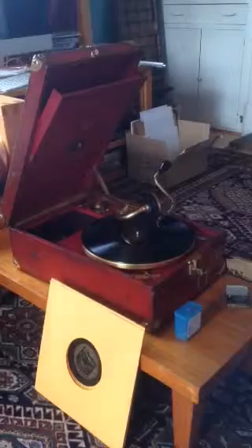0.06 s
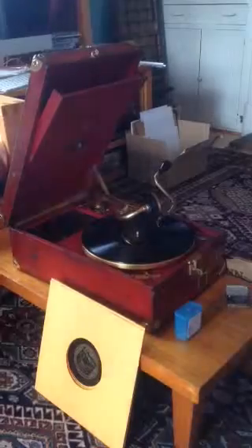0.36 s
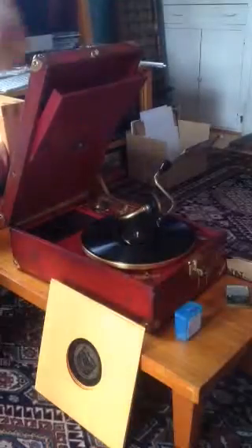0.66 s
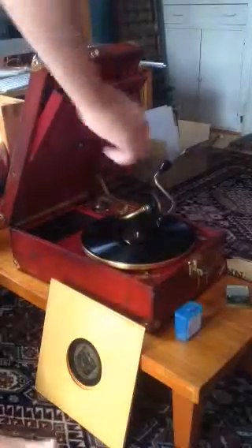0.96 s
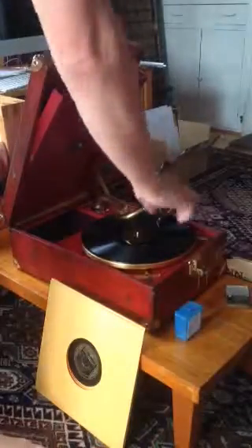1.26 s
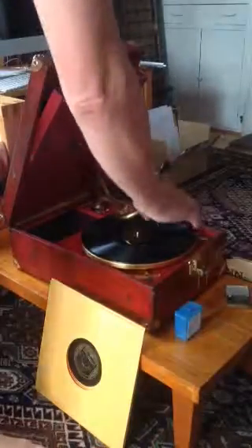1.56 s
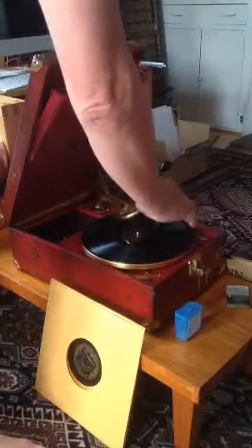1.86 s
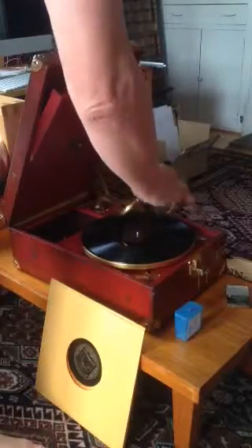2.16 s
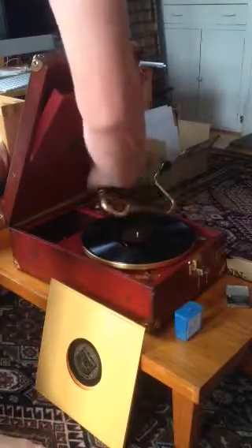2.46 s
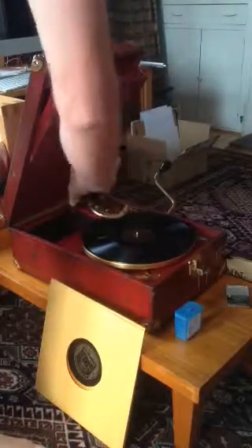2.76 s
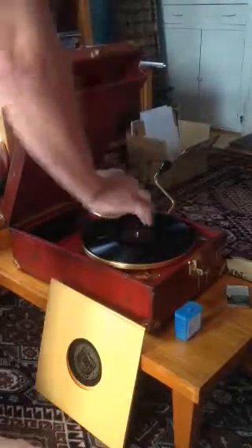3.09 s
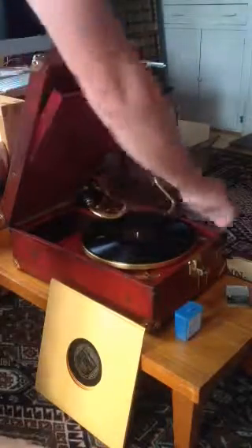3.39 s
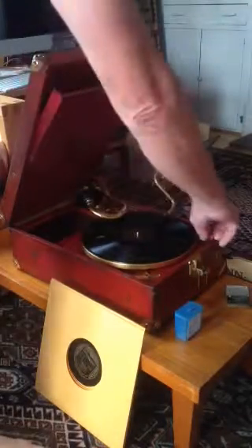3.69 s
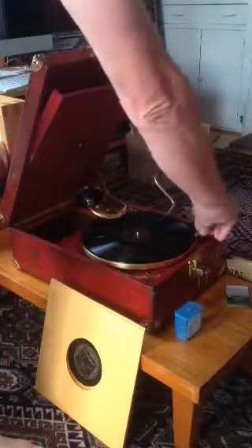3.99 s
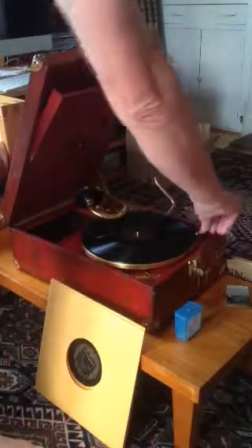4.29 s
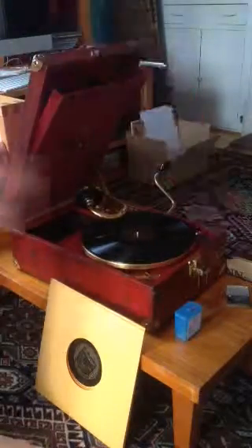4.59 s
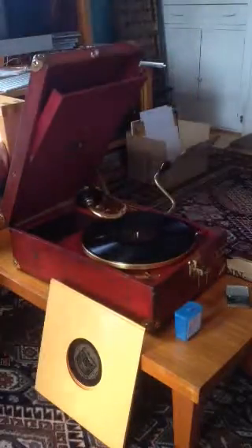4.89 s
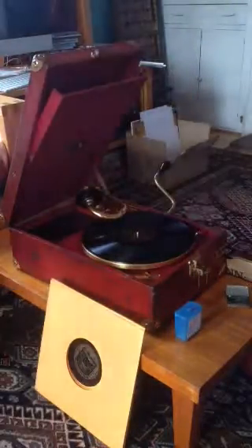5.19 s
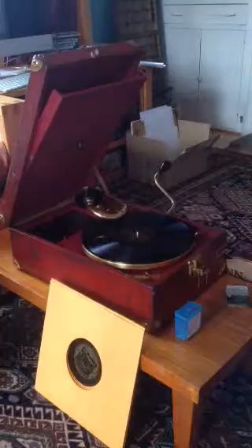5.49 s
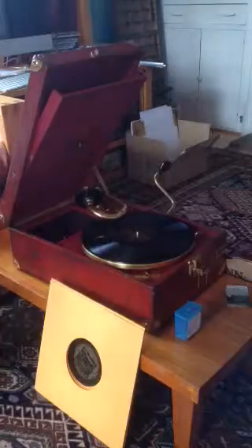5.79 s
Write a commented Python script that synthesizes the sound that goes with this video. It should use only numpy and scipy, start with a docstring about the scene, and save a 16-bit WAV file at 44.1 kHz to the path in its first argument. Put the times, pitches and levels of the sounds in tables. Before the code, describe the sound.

Faint record hiss cuts off, then a wind-up gramophone gives a clattering clack and a few small clicks in a quiet room.

```python
"""A wind-up portable gramophone runs out its record, close to one microphone in a carpeted room.
The steel needle rubs the groove, hissing and crackling through the horn, until the arm is lifted.
The brake bites with a clattering clack: steel chatters, the wooden case rings, the works rattle out.
Then something hard is handled nearby, with a few lighter clicks and brief scrapes.
Behind it all are soft rustles of clothes, quiet room tone and microphone hiss."""
import sys
import numpy as np
from scipy import signal
from scipy.fft import rfft, irfft
from scipy.io import wavfile

SR = 44100
rng = np.random.default_rng(int(sys.argv[2]) if len(sys.argv) > 2 else 0)


def generate_wav(signal):
    """Clip the signal to [-1, 1] and save it as 16-bit WAV at the path in sys.argv[1]."""
    frames = np.transpose(np.atleast_2d(signal))
    scaled = np.clip(frames, -1, 1) * 32767
    pcm = np.round(scaled).astype(np.int16)
    wavfile.write(sys.argv[1], SR, pcm)


N = 257984
TIME = np.arange(N) / SR


# hiss at the needle tip: t/s, relative level/dB
GROOVE_HISS = [(0.0, -58.5), (0.02, -61.5), (0.24, -59.5), (0.34, -61), (0.52, -56.5), (0.68, -61),
               (0.71, -53.5), (0.78, -61.5), (0.87, -56.5), (0.96, -62), (1.11, -55.5), (1.16, -60),
               (1.22, -58), (1.57, -58.5), (1.6, -57.5), (1.68, -61), (1.8, -58.5), (2.13, -56)]
# specks in the groove, the last just before the arm lifts: t/s, relative level/dB
SPECKS = [(.186, -48), (0.543, -44), (.603, -49), (0.713, -49.5), (1.099, -47.5), (1.597, -45),
          (2.144, -45)]
def needle(grains_per_s, size_spread_db, patchy_db, hiss_db, pop_db, lift_s, lift_fade_s):
    """The tip rubs the groove and hits grains of shellac filler, louder in worn patches; specks pop."""
    sizes = from_db(size_spread_db * np.minimum(rng.exponential(1, N), np.pi)) * rng.choice([-1, 1], N)
    grains = rms_one(sizes * (rng.random(N) < grains_per_s / SR))
    wear = rms_one(softened(rng.standard_normal(N), cut_hz=120))
    rubbing = rms_one(grains * from_db(patchy_db * np.tanh(wear)) + rng.standard_normal(N))
    in_groove = np.clip((lift_s - TIME) / lift_fade_s, 0, 1)
    level = from_db(np.interp(TIME, *np.transpose(GROOVE_HISS)) + hiss_db) * in_groove
    times, speck_db = np.transpose(SPECKS)
    pops = sum(contact(times, speck_db + pop_db, skid_s=0.0022, rough_db=17.5))
    return level * rubbing + pops


# passband of soundbox and horn: f/Hz, relative level/dB
HORN_PASSBAND = [(100, -32), (250, -7), (450, -4.5), (750, -3.5), (1080, -4), (1350, -3.5), (2300, -4.5),
                 (2900, -9.5), (3400, -11.5), (4000, -12), (4400, -19), (7000, -24.5), (14000, -28)]
# resonances of horn and diaphragm: f/Hz, width/Hz, lift/dB
HORN_RESONANCES = [(693, 40, 5), (865, 95, 5.5), (1205, 30, 4), (1286, 30, 5), (1394, 30, 4), (1499, 30, 4),
                   (1640, 60, 7.5), (1803, 30, 4), (2118, 40, 5), (2460, 45, 5), (2720, 100, 8),
                   (3085, 45, 11), (3860, 80, 10)]
def horn(x):
    """The diaphragm and the folded horn pass the middle range and add their resonances."""
    x = coloured(x, HORN_PASSBAND)
    for hz, width_hz, lift_db in HORN_RESONANCES:
        x = x + (from_db(lift_db) - 1) * signal.lfilter(*signal.iirpeak(hz, hz / width_hz, fs=SR), x)
    return x


# knocks on the machine, the loudest as the brake bites: t/s, force/dB, hardness/octaves
CASE_KNOCKS = [(.105, -56, .8), (.49, -52, 1.24), (.527, -55.5, 1.5), (.545, -60, 5.6), (.749, -51.5, 0.84),
               (1.088, -52.5, 1.7), (2.085, -50.5, .6), (2.106, -51.5, 0.55), (2.296, -67.5, 3.2),
               (2.573, -65.5, 4.5), (2.682, -66, 3.7), (3.454, -61.5, 2.9), (3.658, -46, 1.7),
               (3.836, -53.5, 2.03), (3.999, -45, 5.4), (4.004, -45, 1.8), (4.030, -40.5, 5.5),
               (4.0378, -36.5, 3.1), (4.046, -31.5, 1.37), (4.054, -23, 3.4), (4.0915, -28, 2.97),
               (4.094, -29.5, 0.088), (4.101, -35, 3.2), (4.111, -34, 3.4), (4.1265, -36, 2.44),
               (4.184, -47, 4.7), (4.198, -46.5, 2.7), (4.214, -49, 2.05), (4.263, -54, 3.7),
               (4.3059, -52.5, 2.25), (4.3876, -64, 4)]
# damped modes of the wooden case and motor board: f/Hz, relative level/dB, t60/s
CASE_MODES = [(59.7, -11, 0.11), (125, 1.5, 0.12), (205, -12, 0.16), (324, -1, 0.063), (378, -1.5, 0.055),
              (517, 1, 0.037), (675, -2, 0.025), (804, 7, 0.019), (1140, 10, 0.0064), (2010, 3, 0.025),
              (1910, 5, 0.0066), (2400, 9.5, 0.016), (2960, 13, 0.005), (3760, 3, 0.0051),
              (4000, -14, 0.011)]
# colour of the crack where the parts meet: f/Hz, relative level/dB
CASE_CRACK = [(1500, -8), (4000, 1), (5300, -0.5), (7000, -11), (10000, -15.5), (15000, -29)]
def gramophone_body():
    """Knocks and the rattling works ring the wooden case and the metal in it, each with a crack."""
    knocks = np.vstack([CASE_KNOCKS, works_rattle(count=12, gap_s=0.024, jitter_s=0.00594)])
    wood = struck(knocks, CASE_MODES, skid_s=0.002, rough_db=2.5, gain_db=1)
    metal = metalwork(knocks, driven_at_hz=2000, gain_db=-1)
    return softened(wood + metal, cut_hz=4000) + cracks(knocks, CASE_CRACK, gain_db=-50.5, fade_s=0.017)


# steel ticking when touched, chattering as the brake bites: t/s, level/dB, lean to the upper note/dB
BRAKE_TICKS = [(2.575, -54, 5), (3.836, -53.5, 5.5), (4.028, -38, 2), (4.039, -26.5, 4), (4.0918, -22, -1),
               (4.128, -23.5, -2.5), (4.17, -38, -1), (4.186, -37, 2), (4.198, -30.5, -6),
               (4.2624, -55, -1), (4.277, -51, -11.5), (4.3082, -40, -8)]
# the two notes of the brake's steel parts: f/Hz
BRAKE_NOTES = [3300, 4100]
def brake_chatter(t60, skid_s, rough_db, gain_db):
    """Steel ticks, damped at once by the pad and the lever."""
    times, db, lean_db = np.transpose(BRAKE_TICKS)
    ticks = 0
    for side, hz in zip((-1, 1), BRAKE_NOTES):
        pushes = sum(contact(times, db + side * lean_db + gain_db, skid_s, rough_db))
        ticks = ticks + ring(pushes, hz, t60)
    return softened(ticks, cut_hz=3760)


# long-ringing modes of turntable and motor: f/Hz, relative level/dB, t60/s
METAL_MODES = [(492, -19, .5), (545, -27, .3), (675, -15, .17), (784, -12, .21), (915, -12, .25),
               (1076, -10, .2), (1179, -14, .22), (1474, -14, .15), (1720, -21, .15), (1980, -15, .2),
               (2307, -14, .18), (2556, -14, .16), (3390, -23, .08)]
def metalwork(blows, driven_at_hz, gain_db):
    """Hard, bright blows get through best to the turntable and motor and set them ringing."""
    pushes = impulses(blows[:, 0], from_db(force_db(blows, driven_at_hz) + gain_db))
    return sum((-1) ** k * from_db(db) * ring(pushes, hz, t60)
               for k, (hz, db, t60) in enumerate(METAL_MODES))


def works_rattle(count, gap_s, jitter_s, from_s=4.145, loss_db_per_s=23, spread_db=2.5, hardness=2.08):
    """The braked works rattle on in uneven, fading knocks: rows of t/s, force/dB, hardness/octaves."""
    early_late, weak_strong = rng.uniform(-1.064, 1, (count, 2)).T
    after_s = gap_s * np.arange(count) + jitter_s * early_late
    db = -51 - loss_db_per_s * after_s + spread_db * weak_strong
    return np.column_stack([from_s + after_s, db, np.full(count, hardness)])


# clicks of the small hard thing nearby: t/s, force/dB, hardness/octaves
THING_CLICKS = [(4.812, -72.5, 5.75), (4.99, -60, 1.7), (5.045, -66.5, 3.1), (5.2445, -59, 1.7),
                (5.345, -58, 2.7), (5.352, -53, 3.8), (5.444, -50.5, 2.5), (5.4543, -34.5, 1.96),
                (5.4605, -42.5, 3.2), (5.497, -46.5, 4), (5.5465, -44, 3.69), (5.7378, -42.5, 4.27),
                (5.743, -53, 1.46)]
# its modes: f/Hz, relative level/dB, t60/s
THING_MODES = [(373, 6, 0.035), (434, -4, 0.02), (594, -5, 0.033), (830, 7.5, 0.017), (865, 11, 0.0084),
               (1170, 2.5, 0.014), (1465, 9, 0.016), (1780, 11, 0.0074), (2040, -5.5, 0.14),
               (2300, 6.5, 0.0062), (3220, 2, .007), (4350, -6, 0.008)]
# colour of the snap at its surface: f/Hz, relative level/dB
THING_SNAP = [(1000, -2), (3500, -0.5), (6000, -10.5), (9000, -17), (15000, -23)]
def handled_thing(echo_s, echo_db):
    """A small hard thing clicks, with little bass; a surface close by throws the sound back."""
    body = struck(THING_CLICKS, THING_MODES, skid_s=0.0018, rough_db=3.5, gain_db=0.5)
    snap = cracks(THING_CLICKS, THING_SNAP, gain_db=-36, fade_s=0.0068)
    direct = without_bass(body + snap, cut_hz=290)
    return direct + from_db(echo_db) * np.interp(TIME - echo_s, TIME, direct, left=0)


# clothes rustling, then (last three rows) the handled thing scraping: t/s, half length/s, level/dB
RUB_SWELLS = [(0.789, 0.029, -60), (3.235, 0.034, -72), (3.473, 0.16, -73), (4.799, 0.036, -68),
              (4.932, 0.071, -69.5), (5.468, 0.058, -61), (5.545, 0.063, -57.5), (5.756, 0.069, -60.5)]
# colour of the rubbing: f/Hz, relative level/dB
RUB_COLOUR = [(300, -11.5), (1200, 5), (2700, 6), (4500, 1.5), (8000, -7), (15000, -20)]
def rustles_and_scrapes():
    """Swells of friction noise: soft rustles of clothes, then brief scrapes of the thing as it clicks."""
    swell = sum(from_db(db) * np.exp(-((TIME - s) / half_s) ** 2) for s, half_s, db in RUB_SWELLS)
    return swell * coloured(rng.standard_normal(N), RUB_COLOUR)


# short decay of the carpeted room: f/Hz, t60/s
ROOM_DECAY = [(120, 0.065), (500, 0.25), (1200, 0.15), (3000, 0.23), (9000, 0.15)]
def in_room(x, wet_db, build_s):
    """Dense reflections build up at the microphone over a few ms and die away band by band."""
    t, tail = TIME[:SR // 2], 0
    edges = np.geomspace(60, 16000, 15)
    for low, high in zip(edges, edges[1:]):
        bandpass = signal.butter(2, [low, high], "band", fs=SR, output="sos")
        band = signal.sosfilt(bandpass, rng.standard_normal(len(t)))
        band = band * 1000 ** (-t / at_hz(ROOM_DECAY, np.sqrt(low * high)))
        band = band * (1 - np.exp(-(t / build_s) ** 2))
        tail = tail + band * np.sqrt((high - low) / (SR / 2) / np.sum(band ** 2))
    return x + from_db(wet_db) * signal.fftconvolve(x, tail)[:N]


# room tone and microphone hiss: f/Hz, relative level/dB
ROOM_TONE = [(25, -17.5), (55, -8), (85, -0.5), (108, -5), (150, -0.5), (185, 0.5), (240, -4.5), (380, -10),
             (700, -12), (1300, -18), (3100, -16.5), (8000, -18.5), (15000, -19.5)]
def room_tone(level_db):
    """The quiet room murmurs steadily under the microphone's own hiss."""
    return from_db(level_db) * coloured(rng.standard_normal(N), ROOM_TONE)


def struck(blows, modes, skid_s, rough_db, gain_db):
    """Each blow rings every mode; its skid gives every blow a colour of its own."""
    blows, out = np.array(blows), 0
    for k, (hz, level_db, t60) in enumerate(modes):
        push, skid = contact(blows[:, 0], force_db(blows, hz) + level_db + gain_db, skid_s, rough_db)
        quick = min(hz * skid_s / 2, 1)   # slow modes feel the whole flurry as one push
        mode = ring(push + quick * skid, hz, t60) / np.hypot(1, quick * from_db(rough_db))
        out = out + (-1) ** k * mode
    return out


def force_db(blows, hz, thud_hz=125):
    """A blow drives one register most, its hardness in octaves above a dull thud."""
    _, db, hardness = np.transpose(blows)
    octaves = np.log2(hz / thud_hz) - hardness
    return db - 8 * np.maximum(octaves, 0) + 10 * np.minimum(octaves, 0)   # slopes in dB per octave


def contact(times, levels_db, skid_s, rough_db):
    """A contact pushes once, then skids for a few ms in a flurry of tiny impacts: (push, skid)."""
    pushes = impulses(times, from_db(levels_db))
    r = np.exp(-1 / (skid_s * SR))
    flurry = signal.lfilter([1], [1, -2 * r, r * r], pushes + 1e-18) * 2 / (skid_s * SR) ** (3 / 2)
    return pushes, from_db(rough_db) * flurry * rng.standard_normal(N)


def cracks(blows, colour, gain_db, fade_s):
    """The surfaces grate briefly where they meet, most in strong, hard blows."""
    times, db, hardness = np.transpose(blows)
    heights = from_db(0.65 * db + 4.5 * hardness + gain_db)
    grating = signal.lfilter([1], [1, -np.exp(-1 / (fade_s * SR))], impulses(times, heights) + 1e-18)
    return coloured(grating * rng.standard_normal(N), colour)


def ring(pushes, hz, t60):
    """A unit push sets a sine of height 1 ringing."""
    r, w = 1000 ** (-1 / (t60 * SR)), 2 * np.pi * hz / SR
    return signal.lfilter([0, np.sin(w)], [1, -2 * r * np.cos(w), r * r], pushes + 1e-18)


def impulses(times, heights):
    """One single-sample push at each time."""
    out = np.zeros(N)
    out[np.round(np.asarray(times) * SR).astype(int)] = heights
    return out


def softened(x, cut_hz):
    """Low-pass: a contact lasts too long to shake the highest frequencies."""
    return signal.sosfilt(signal.butter(2, cut_hz, fs=SR, output="sos"), x)


def without_bass(x, cut_hz):
    """High-pass: small things radiate hardly any deep bass."""
    return signal.sosfilt(signal.butter(2, cut_hz, "high", fs=SR, output="sos"), x)


def coloured(x, spectrum):
    """Gives x a smooth spectrum; white input keeps its power."""
    gain = from_db(at_hz(spectrum, np.linspace(0, SR / 2, N + 1)))
    return irfft(rfft(x, 2 * N) * rms_one(gain))[:N]


def at_hz(points, hz):
    """Reads rows of f/Hz, value on a log-frequency axis."""
    known_hz, values = np.transpose(points)
    return np.interp(np.log(np.maximum(hz, 1)), np.log(known_hz), values)


def from_db(db):
    return 10 ** (np.asarray(db) / 20)


def rms_one(x):
    return x / np.sqrt(np.mean(x ** 2) + 1e-20)


def scene():
    """Gramophone and small hard thing, close to one microphone in the same quiet room."""
    groove = needle(grains_per_s=1200, size_spread_db=3.0, patchy_db=3.3, hiss_db=-3.5, pop_db=-1.5,
                    lift_s=2.168, lift_fade_s=0.0017)
    hiss = in_room(horn(groove), wet_db=-7.0, build_s=0.0014)
    body = gramophone_body()
    brake = brake_chatter(t60=0.006, skid_s=0.00084, rough_db=2.5, gain_db=-2)
    thing = handled_thing(echo_s=0.011, echo_db=-22)
    handling = in_room(body, wet_db=-6.0, build_s=0.0064)
    handling += in_room(thing, wet_db=-5.0, build_s=0.0042)
    handling += in_room(brake, wet_db=-8.0, build_s=0.0023)   # short, dry ticks with little room ring
    handling = without_bass(handling, cut_hz=123)
    return (hiss + handling + rustles_and_scrapes() + room_tone(level_db=-65.5))[None]


def record(dry):
    """The top is cut steeply above 15250 Hz."""
    return signal.sosfilt(signal.ellip(12, .1, 70, 15250, fs=SR, output="sos"), dry)


dry = scene()
out = record(dry)
generate_wav(out)
```